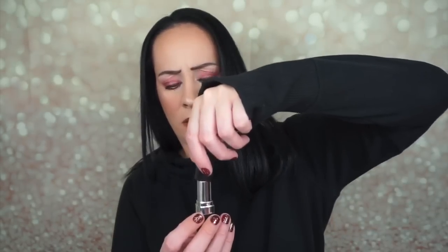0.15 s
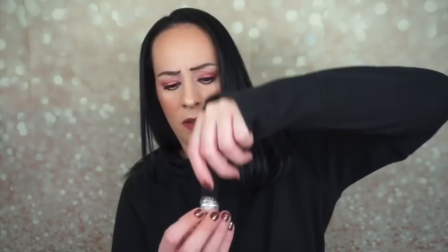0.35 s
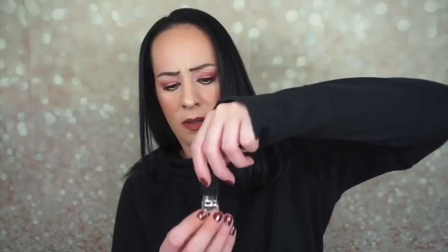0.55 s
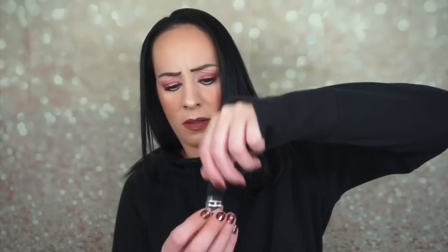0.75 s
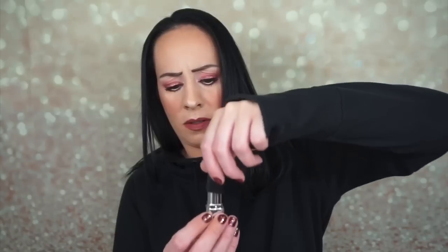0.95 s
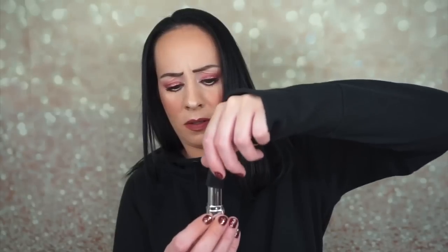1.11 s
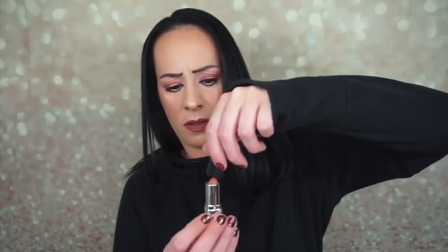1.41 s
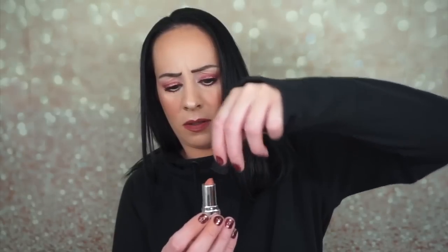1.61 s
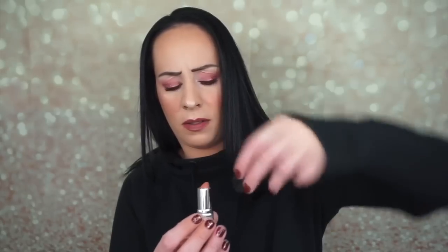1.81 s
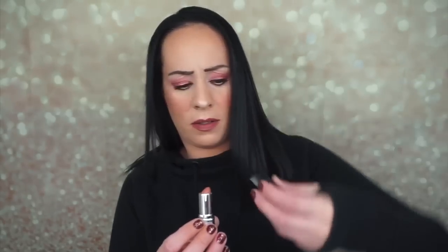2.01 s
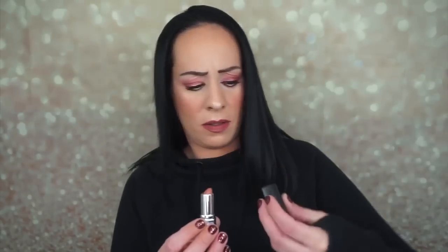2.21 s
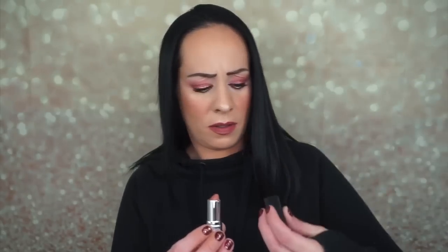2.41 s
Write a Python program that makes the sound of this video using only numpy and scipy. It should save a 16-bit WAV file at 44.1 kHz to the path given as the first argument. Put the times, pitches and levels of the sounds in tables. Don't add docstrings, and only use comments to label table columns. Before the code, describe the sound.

A thin cap rattles along a lipstick tube and clicks shut in a quiet furnished room

```python
import sys
import numpy as np
from scipy import signal
from scipy.fft import rfft, irfft, next_fast_len
from scipy.io import wavfile

SR = 44100
rng = np.random.default_rng(int(sys.argv[2]) if len(sys.argv) > 2 else 0)


def waveform_to_disk(signal):
    frames = np.transpose(np.atleast_2d(signal))
    scaled = np.clip(frames, -1, 1) * 32767
    samples = np.round(scaled).astype(np.int16)
    wavfile.write(sys.argv[1], SR, samples)


def decibels_to_gain(level_db):
    exponent = np.asarray(level_db, float) / 20
    return 10 ** exponent


N = 112454

# [f/Hz, level per Hz/dB]
AIR_SPECTRUM = [(35, -41.5), (60, -9.5), (135, -4.5), (262, -9), (292, -13.5), (372, -5.5), (659, -21.5),
                (10500, -39.5), (11500, -43.5), (15000, -74), (22000, -120)]
# [f/Hz, likeness from -1 to 1]
EAR_LIKENESS = [(30, 0.98), (125, 0.99), (500, 0.58), (2000, 0.15), (8000, 0.17)]
# [t/s, level/dB]
RUMBLE_LEVEL = [(0.0, -52), (0.14, -50.5), (0.22, -58), (0.38, -52.5), (1.28, -55), (1.4, -51), (1.45, -61),
                (1.6, -52.5), (1.64, -74), (1.72, -55.5), (2.02, -58), (2.11, -56), (2.19, -57),
                (2.25, -50), (2.41, -54), (2.55, -57)]
# [t/s, level/dB]
SLEEVE_LEVEL = [(0, -64), (.4, -62), (.9, -62), (1.15, -71.5), (1.45, -65), (1.75, -71), (2.07, -67),
                (2.25, -72.5), (2.55, -68.5)]
# [t/s, level/dB]
HUM_LEVEL = [(0.0, -55), (0.33, -52), (1.16, -59.5), (1.5, -62.5), (1.89, -56.5), (2.19, -62.5),
             (2.55, -56)]
# [f/Hz, width/Hz, level/dB]
DRONE_RESONANCES = [(236, 30, -4.5), (423, 29, -2), (483.6, 20, -1), (562, 14, -4), (340, 300, -11)]
# [t/s, shell level/dB, hollow air level/dB]
CAP_KNOCKS = [(.057, -48, -53), (.221, -56, -44), (.336, -54, -39), (.373, -56, -43), (.44, -42, -38),
              (.594, -50, -45), (.6292, -26, -32), (.66, -50, -42), (.703, -58, -39), (.7417, -16.5, -21),
              (.7505, -29.5, -27), (.805, -35, -35.5)]
# [f/Hz, level/dB, time to fall 60 dB/s]
SHELL_MODES = [(1550, -8, .022), (1860, -1, .02), (2030, 0, .02), (2350, -1, .015), (2700, -4, .013)]
# [f/Hz, level/dB, time to fall 60 dB/s]
INNER_AIR_MODES = [(680, 0, .03), (815, -1, .028), (970, -5, .025)]
# [t/s, level/dB]
RIM_SEATS = [
    (.745, -34.5),
    (.7505, -26.5),
    (.7595, -38),
    (.772, -41.5),
]
# [f/Hz, level/dB, time to fall 60 dB/s]
RIM_RINGING = [(3280, -2, .02), (3430, 0, .025), (3704, 2, 0.012), (3970, -9.5, 0.026)]
# [t/s, peak level/dB, top modes level/dB, low modes level/dB]
EDGE_TICKS = [(.1486, -58, 10.5, -12), (.2209, -28, 8, -1.5), (.2748, -39.5, 3.5, -33),
              (.3072, -30.5, 9, -9), (.3351, -31.5, 2, -8), (.3488, -33.5, 5, -8), (.3721, -34, -12, -10),
              (.391, -31.5, -5.5, -6), (.4394, -28, -2, -2), (.4434, -27.5, 4, -1), (.4783, -36, -1, -16),
              (.5257, -21.5, 2, -8), (.594, -31, 2, -4), (.6034, -31.5, 5, 1), (.629, -35.5, -6, 4.5),
              (.6554, -28, -5, -4), (.7028, -38, 9, 3), (.7064, -31.5, 9, -4.5), (.7414, -26.5, -6, 2),
              (.7502, -10, -5, -9.5), (.8051, -24, 8.5, -1), (.8387, -40.5, 10, -10),
              (1.0095, -42, 2.5, -0.5)]
# [t/s, peak level/dB, top modes level/dB, low modes level/dB]
TICK_BOUNCES = [
    (.227, -33, 0, -5),
    (.448, -30, 0, -5),
    (.535, -33, 0, -8),
    (.668, -39, 0, -5),
    (.7465, -27, -3, -4),
    (.7595, -19, -8, -10),
    (.803, -34, -4, 5),
    (.811, -28, 0, -4),
]
# [f/Hz, level/dB, time to fall 60 dB/s]
TUBE_LOW = [(2870, -2, .026), (3080, -5, .016), (3600, -6, .01), (4300, -5, .007), (5300, -5, .007)]
TUBE_MIDDLE = [(6300, -4, .015), (6920, -1, .015), (7300, 0, .014), (7950, -2, .012), (8500, -2, .012)]
TUBE_TOP = [(8820, -5, .012), (9980, -0.5, .012), (10530, -3.5, .012), (10780, 0.5, .012)]
# [t/s, level/dB]
SLIDE_PRESSURE = [
    (.2, -110),
    (.23, -72.5),
    (.35, -61),
    (.42, -68.5),
    (.58, -72),
    (.67, -57),
    (.73, -69),
    (.76, -47),
    (.86, -69.5),
    (.97, -120),
]

AIR_DB, HISS_DB, HISS_LOW_HZ = -53, -69, 4900
RUMBLE_HZ, RUMBLE_WIDTH_HZ = 38, 26
SLEEVE_HZ, SLEEVE_WIDTH_HZ = 1200, 1000
HUM_HZ, HUM_WIDTH_HZ, HUM_DB = 362.4, 5.3, -3
DRONE_DB, DRONE_FOLLOWS = -5.5, 1.3
TICK_DB, KNOCK_DB, CRACK_DB = -8.5, -8.5, -0.5
CHATTER_S, CHATTER_LOSS_DB, CHATTER_SPREAD_DB, FIRST_TOUCH_DB = 0.0017, 1.5, 5.0, 4
GRIP_DETUNE, MODE_SPREAD_DB, CONTACT_WIDTH = 0.012, 2.0, 0.35
EAR_SPREAD_DB, EAR_LAG_S, PAN_DB = 1.5, 0.00004, -1.55
GRAINS_PER_S, GRAIN_SPREAD_DB = 2000, 3.5
HANDS_LOW_CUT_HZ, TUBE_LOW_CUT_HZ = 600, 2500
EARLY_DB, EARLY_T60_S = -7, 0.063
ROOM_DB, ROOM_T60_S, WALL_CUT_HZ = -10, 0.45, 6900
CUTOFF_HZ = 11130


def rms_one(x):
    return x / np.sqrt(np.mean(x ** 2) + 1e-20)


def in_time(rows):
    return np.interp(np.arange(N) / SR, *np.transpose(rows))


def at_hz(points, hz):
    point_hz, value = np.transpose(points)
    return np.interp(np.log(hz), np.log(point_hz), value)


def hump(centre_hz, width_hz):
    return lambda hz: 1 / (1 + (2 * (hz - centre_hz) / width_hz) ** 2)


def stereo_noise(gain):
    size = next_fast_len(N, True)
    hz = np.maximum(np.fft.rfftfreq(size, 1 / SR), 1)
    mid, side = rfft(rng.standard_normal((2, size))) * gain(hz)
    alike = np.clip(at_hz(EAR_LIKENESS, hz), -1, 1)
    both_ears = np.sqrt(1 + alike) * mid + np.sqrt(1 - alike) * side * [[1], [-1]]
    return rms_one(irfft(both_ears, size))[:, :N]


def background():
    air = decibels_to_gain(AIR_DB) * stereo_noise(lambda hz: decibels_to_gain(at_hz(AIR_SPECTRUM, hz)) / (1 + (60 / hz) ** 4))
    rumble = decibels_to_gain(in_time(RUMBLE_LEVEL)) * stereo_noise(hump(RUMBLE_HZ, RUMBLE_WIDTH_HZ))
    sleeve = decibels_to_gain(in_time(SLEEVE_LEVEL)) * stereo_noise(hump(SLEEVE_HZ, SLEEVE_WIDTH_HZ))
    swell = in_time(HUM_LEVEL)
    hum = decibels_to_gain(swell + HUM_DB) * stereo_noise(hump(HUM_HZ, HUM_WIDTH_HZ))
    drone_db = swell + DRONE_DB + DRONE_FOLLOWS * (swell - swell.mean())
    drone = stereo_noise(lambda hz: sum(decibels_to_gain(db) * hump(centre, width)(hz)
                                        for centre, width, db in DRONE_RESONANCES))
    return air + hum + decibels_to_gain(drone_db) * drone + rumble + sleeve


def ring(clicks, hz, t60):
    r = decibels_to_gain(-60 / (t60 * SR))
    w = 2 * np.pi * hz / SR
    return signal.lfilter([0, np.sin(w)], [1, -2 * r * np.cos(w), r * r], clicks + 1e-18)


def soften(x, hz):
    r = np.exp(-np.pi * CONTACT_WIDTH * hz / SR)
    turn = 2 * r * np.cos(2 * np.pi * hz / SR)
    return signal.lfilter([(1 - r * r) / 2, 0, (r * r - 1) / 2], [1, -turn, r * r], x)


def strike(modes, s, db, touches):
    out = np.zeros((2, N))
    span = 3000
    step = np.cumsum(touches, axis=1) - touches[:, :1]
    unevenness = CHATTER_SPREAD_DB * np.abs(np.log(touches)) * (step > 0)
    level = np.array(db)[:, None] - CHATTER_LOSS_DB * step - unevenness
    luck = rng.standard_normal((len(s), len(modes), 4))
    hits = rng.uniform(-1, 1, (len(s), len(modes), touches.shape[1]))
    hits[..., 0] = 2 * decibels_to_gain(FIRST_TOUCH_DB) - 1
    for k, start in enumerate((np.array(s) * SR).astype(int)):
        when = (CHATTER_S * step[k] * SR).astype(int)
        for (hz, mode_db, t60), (tune, own, ear, lag), hit in zip(modes, luck[k], hits[k]):
            clicks = np.zeros(span)
            np.add.at(clicks, when, decibels_to_gain(level[k]) * (hit + np.sign(hit)) / 2)
            ringing = ring(clicks, hz * (1 + GRIP_DETUNE * tune), t60)
            sound = decibels_to_gain(mode_db + MODE_SPREAD_DB * own) * soften(ringing, hz)
            late = start + int(EAR_LAG_S * SR * abs(lag))
            out[0, start:start + span] += sound * decibels_to_gain(EAR_SPREAD_DB * ear / 2)
            out[1, late:late + span] += sound * decibels_to_gain(-EAR_SPREAD_DB * ear / 2)
    return out


def cap():
    s, shell_db, air_db = np.transpose(CAP_KNOCKS)
    touches = rng.uniform(0.78, 1.8, (len(s), 3))
    shell = strike(SHELL_MODES, s, shell_db + KNOCK_DB, touches)
    inner_air = strike(INNER_AIR_MODES, s, air_db + KNOCK_DB, touches)
    rim = strike(RIM_RINGING, *np.transpose(RIM_SEATS), touches[:len(RIM_SEATS)])
    return shell + inner_air + rim


def tube():
    s, db, top_db, low_db = np.transpose([*EDGE_TICKS, *TICK_BOUNCES])
    touches = rng.uniform(0.3, 1.7, (len(s), 7))
    db = db + TICK_DB
    crack = strike([(10300, 0, 0.0024)], s, db + top_db + CRACK_DB, touches)
    low = strike(TUBE_LOW, s, db + low_db, touches)
    middle = strike(TUBE_MIDDLE, s, db, touches)
    top = strike(TUBE_TOP, s, db + top_db, touches)
    tube_low_cut = signal.butter(2, TUBE_LOW_CUT_HZ, "high", fs=SR, output="sos")
    return signal.sosfilt(tube_low_cut, crack + low + middle + top)


def scrape():
    spread_db = GRAIN_SPREAD_DB * np.minimum(rng.exponential(1, N), 4)
    sizes = decibels_to_gain(in_time(SLIDE_PRESSURE) + spread_db)
    grains = sizes * (rng.random(N) < GRAINS_PER_S / SR)
    cap_modes = [(1700, -8.5, 0.012), (2200, -4, 0.0056)]
    out = np.zeros((2, N))
    for hz, db, t60 in [*TUBE_LOW, *TUBE_MIDDLE, *TUBE_TOP, *cap_modes]:
        signed_grains = grains * rng.choice([-1, 1], (2, N))
        out += decibels_to_gain(db) * ring(signed_grains, hz, min(t60, 0.008))
    return out


def fading(noise, t60):
    t = np.arange(noise.shape[-1]) / SR
    return noise * decibels_to_gain(-60 * t / t60) / np.sqrt(t60 * SR / 13.8)


def room(x):
    t = np.arange(SR // 2) / SR
    early, late = rng.standard_normal((2, 2, len(t))) * np.minimum(t / 0.001, 1)
    late = signal.sosfilt(signal.butter(1, WALL_CUT_HZ, fs=SR, output="sos"), late)
    echo = decibels_to_gain(EARLY_DB) * fading(early, EARLY_T60_S) + decibels_to_gain(ROOM_DB) * fading(late, ROOM_T60_S)
    return signal.fftconvolve(x.mean(axis=0)[None], echo, axes=1)[:, :N]


def scene():
    quiet = background()
    hands_low_cut = signal.butter(4, HANDS_LOW_CUT_HZ, "high", fs=SR, output="sos")
    hands = signal.sosfilt(hands_low_cut, cap() + tube() + scrape())
    return hands * decibels_to_gain(np.array([[PAN_DB], [-PAN_DB]])) + room(hands) + quiet


def roll_off(x):
    return signal.sosfilt(signal.butter(12, 12320, fs=SR, output="sos"), x)


def record(dry):
    hiss = decibels_to_gain(HISS_DB) * stereo_noise(lambda hz: 1 / (1 + (HISS_LOW_HZ / hz) ** 2) * (hz < 12000))
    size = next_fast_len(N + SR // 4, True)
    cut = 1 / (1 + (np.fft.rfftfreq(size, 1 / SR) / CUTOFF_HZ) ** 200)
    mix = irfft(rfft(dry + hiss, size) * cut, size)[:, :N]
    return roll_off(mix)


dry = scene()
out = record(dry)
waveform_to_disk(out)
```